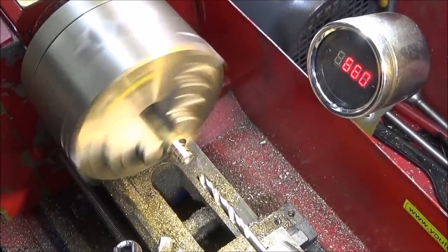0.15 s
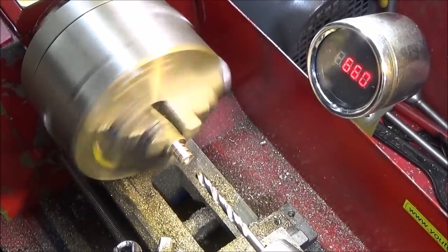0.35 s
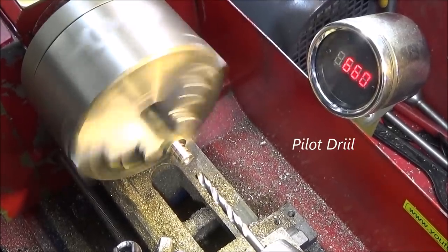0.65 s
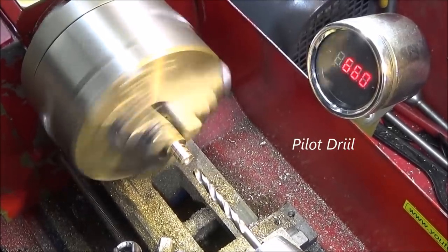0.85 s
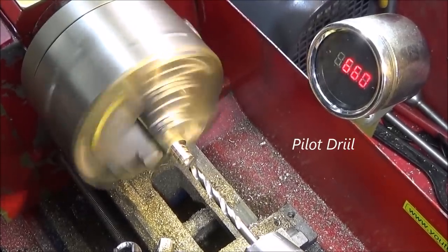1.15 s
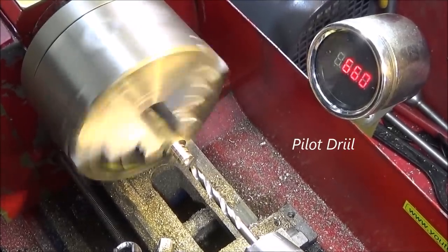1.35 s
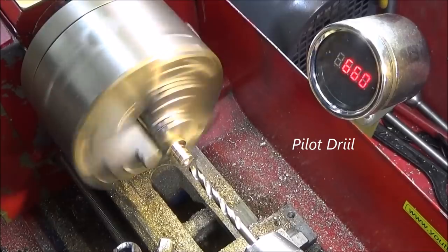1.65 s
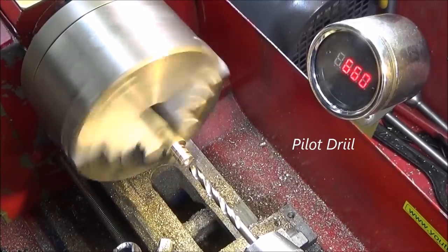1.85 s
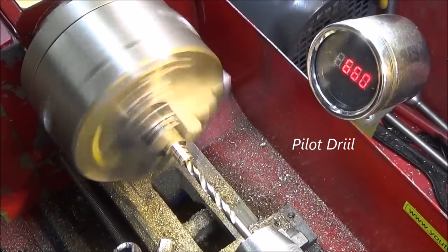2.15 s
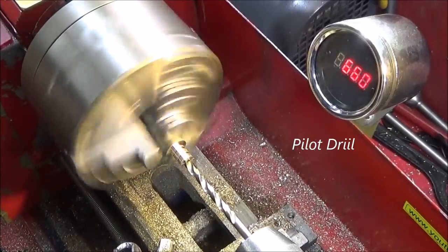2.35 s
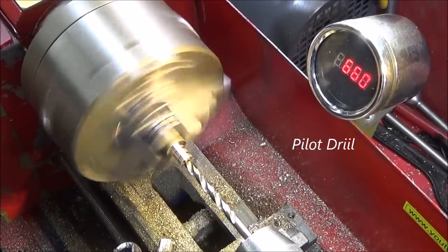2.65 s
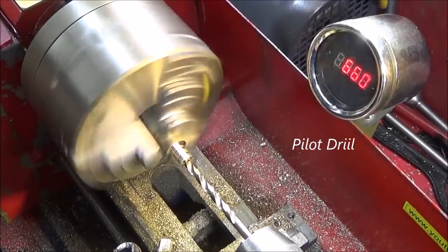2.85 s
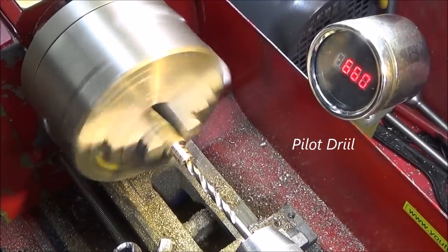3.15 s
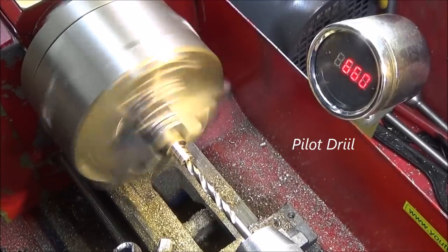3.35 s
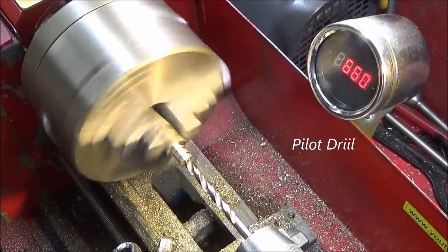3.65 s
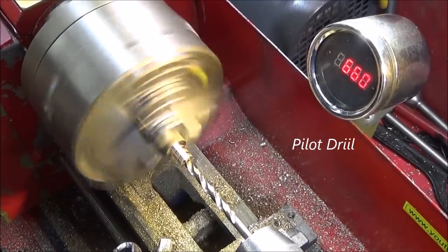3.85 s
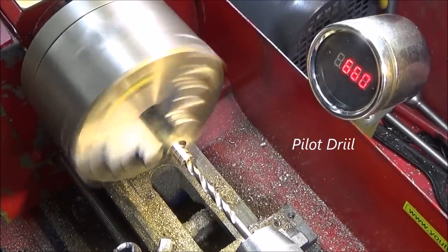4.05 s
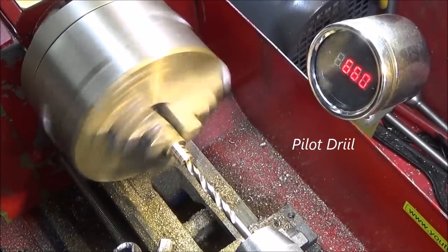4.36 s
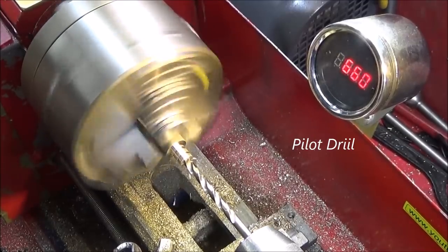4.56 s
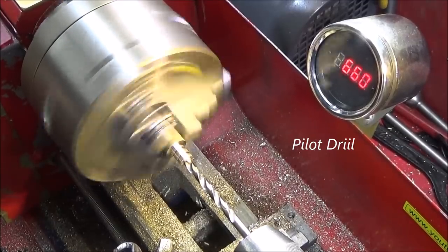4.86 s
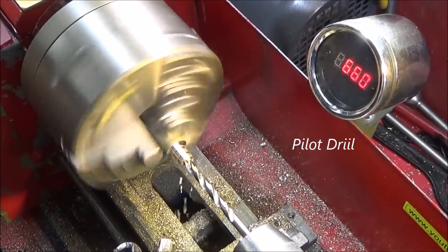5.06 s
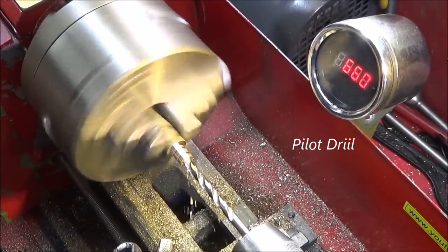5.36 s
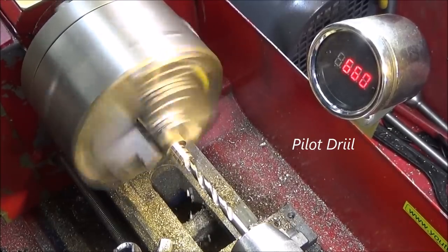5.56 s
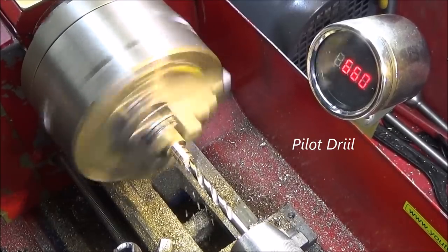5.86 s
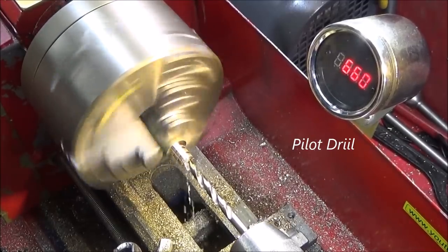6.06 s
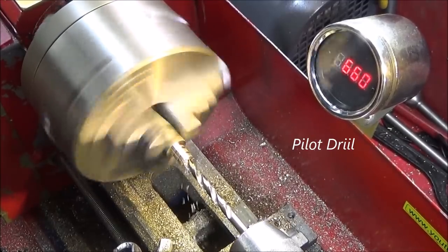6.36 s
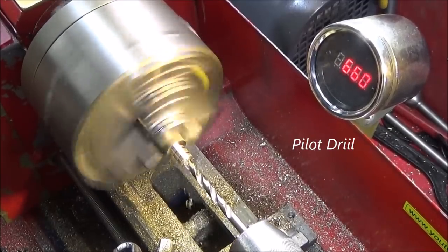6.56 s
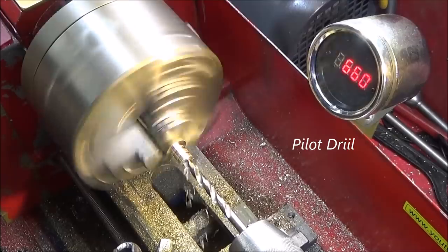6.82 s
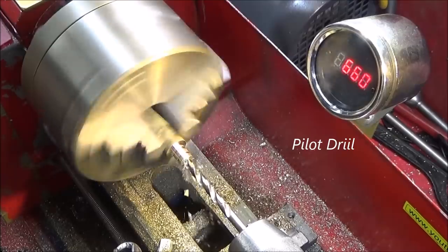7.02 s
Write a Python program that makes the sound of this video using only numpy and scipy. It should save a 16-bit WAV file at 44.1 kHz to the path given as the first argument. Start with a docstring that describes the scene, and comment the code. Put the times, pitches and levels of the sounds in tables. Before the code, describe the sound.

Close, dry stereo sound of a small metal lathe running in a workshop. From 0 s a low motor hum, a dense fluttering whine around 10 kHz, mid-pitched gear tones and a broad bearing rush continue steadily, with faint swarf ticks. At about 2.1 s a small chip click, a soft knock and a faint squeak sound. From 3.3 to 3.85 s the drill tip chirps about seven times, eleven per second, strongest midway. Small clicks lead to the bite at 4.4 s: a coarse, gritty scrape with ringing flutes, grumbles and brief squeaks, while bright chip hiss spreads over the machine. At 5 s a piercing squeal near 8.3 kHz starts abruptly and grows, wavering and throbbing eleven times a second. The scrape settles; after about 6.2 s the feed eases and hiss softens slightly, but the squeal persists to the end near 7 s, with low grumbles and sudden pitch sags.

```python
"""A small lathe spins a brass bar at about 660 rpm, close to a stereo microphone.
From the start, steady tones make the hum and whine of motor and gears, and shaped noise the rush of bearings.
Single chips, knocks and squeaks come first, then a pilot drill grazes the bar and chirps on it once a turn.
It bites with a coarse scrape, made of tiny random fractures, and cuts on with ringing flutes and a hiss of chips.
Last comes a high squeal, a wavering tone that throbs with every turn; later the drill is fed more gently."""
import sys
import numpy as np
from scipy import signal
from scipy.fft import rfft, irfft
from scipy.io import wavfile
from scipy.ndimage import uniform_filter1d

SR = 44100
rng = np.random.default_rng(int(sys.argv[2]) if len(sys.argv) > 2 else 0)


def wrap_up_sound(samples):
    """Save the sound to the file named by the first command line argument, as 16-bit audio."""
    columns = np.atleast_2d(samples).T
    # keep every value between -1 and 1, then stretch to whole-number steps
    tamed = np.clip(columns, -1, 1)
    steps = np.round(tamed * 32767).astype(np.int16)
    wavfile.write(sys.argv[1], SR, steps)


N = 317079

# Hum of the motor. Each row: multiple of the motor speed, level in dB before load and flutter.
HUM_TONES = [(3, -50.0), (6, -32.0), (12, -37.8), (18, -42.2)]
# Whine of the motor. Each row: multiple of the motor speed, level in dB before the shared trim and changes.
WHINE_TONES = [(231, -36.8), (233, -34.1), (234, -32.4), (235, -41.6), (237, -35.7), (238, -41.6),
               (239, -41.8), (240, -39.8), (243, -27.5), (244, -33.8), (245, -27.2), (246, -28.5),
               (247, -26.7), (248, -37.7), (249, -30.4), (250, -39.1), (251, -34.1), (252, -36.4),
               (253, -31.3), (254, -38.7), (255, -27.6), (256, -34.6), (257, -42.4), (258, -36.0),
               (259, -24.7), (260, -40.9), (261, -33.5)]
# Gear and belt tones. Each row: pitch in Hz, level in dB before the shared trim, change under full load in dB.
GEAR_TONES = [(281.8, -35, -4), (332, -36, -8.5), (562.2, -25.5, -12.5), (1176, -33, -5), (1450, -45, 4.5)]
# Colour of the bearing and brush noise. Each row: frequency in Hz, level in dB per Hz before the shared trim.
RUSH_COLOUR = [(25, -69), (130, -61), (210, -63), (300, -52.5), (430, -63.5), (600, -53.5), (780, -59.5),
               (1500, -59), (2600, -59), (6500, -58), (9200, -56), (10400, -53), (11500, -67),
               (15000, -95.5)]
# Resonances of headstock and guards. Each row: centre in Hz, width in Hz, lift in dB (below 0 is a dip).
HEADSTOCK_MODES = [(901, 76, 8), (1167, 22, 9), (1447, 65, 6), (1781, 19, 8), (2110, 24, 4), (3110, 73, 3),
                   (2600, 110, -2.5), (3560, 170, 2), (3860, 90, -2.5), (4110, 28, -10), (5080, 86, 3.5),
                   (5480, 250, 3.5), (6210, 350, 7), (6650, 130, 5.5), (7640, 97, 3.9)]
# Slow swells and sinks of the whine. Each row: middle in seconds, length in seconds, change in dB.
WHINE_DRIFTS = [(.3, .22, 3.2), (1.72, .28, 2.5), (2.86, 0.13, -2.5), (4.15, .3, 0.3)]
# Colour of the swarf ticks. Each row: frequency in Hz, relative level in dB.
TICK_COLOUR = [(1500, -14), (3500, 1.5), (5500, -3.5), (8000, -2), (11000, -20), (15000, -45)]
# Chips cracking off and tailstock knocks.
# Each row: middle in seconds, rms level at the middle in dB, centre in Hz, width in Hz, length in seconds.
CHIP_HITS = [(2.124, -18.5, 3420, 1500, 0.018), (2.13, -18, 6300, 3000, .025), (2.157, -33, 154, 50, 0.044),
             (3.47, -21, 5200, 900, 0.014), (4.267, -26, 345, 90, .025), (4.371, -13, 5600, 900, .002),
             (4.382, -20, 5503, 500, .013), (4.443, -19, 970, 250, 0.014), (4.44, -25, 3950, 401, 0.011),
             (4.5, -21.5, 335, 300, 0.015), (4.56, -21, 3600, 1000, .025), (4.672, -17, 5700, 500, .003),
             (4.877, -14.5, 6800, 1800, .013), (5.155, -20, 5550, 500, .007)]
# Short squeaks: the tip grazing the face at first, then the lips sticking and slipping.
# Each row: middle in seconds, rms level of the pure tone at the middle in dB, pitch in Hz, length in seconds.
SHORT_SQUEAKS = [(2.19, -30, 895, .1), (3.11, -24, 895, .012), (3.245, -22, 897, .009),
                 (4.446, -20, 1170, .012), (4.45, -29, 2900, .01), (4.58, -19, 1190, .02),
                 (4.897, -19.5, 2900, .01), (4.942, -25, 2530, .018), (4.978, -17.5, 2435, 0.017),
                 (5.293, -23, 2885, .012), (5.296, -25, 2140, .012), (5.38, -23, 2900, .01),
                 (5.426, -25.5, 2860, 0.024), (5.53, -22.5, 2890, .011), (5.593, -24, 2880, .012),
                 (5.622, -26, 2925, .014), (5.814, -25.5, 2890, 0.014)]
# Modes of the flutes and tailstock; many glide as the hole grips more of them. Each row: start in seconds,
# end in seconds, first Hz, last Hz, width in Hz, first level in dB, last level in dB, before the stutter.
FLUTE_MODES = [(4.43, 4.92, 1175, 1215, 150, -27.5, -26), (4.6, 4.9, 1330, 1330, 160, -30, -29),
               (4.95, 7.3, 1300, 1300, 280, -38.5, -38), (4.44, 4.99, 2910, 2890, 220, -28, -27),
               (5.05, 5.92, 2860, 2900, 300, -30.5, -35), (4.51, 4.87, 3130, 3130, 160, -30, -32),
               (4.52, 4.92, 2650, 2600, 400, -29, -27), (4.77, 4.85, 2050, 2250, 700, -24, -21),
               (4.9, 5.03, 2480, 2380, 450, -22.5, -25), (5.03, 5.46, 2480, 2740, 240, -25.5, -31),
               (4.46, 4.95, 7850, 7850, 700, -25, -26), (4.46, 4.95, 9400, 8700, 400, -28, -29),
               (5.0, 6.27, 6350, 7170, 700, -24, -28.5), (5.0, 5.949, 9620, 9950, 450, -26, -24),
               (6.0, 6.28, 10700, 10550, 800, -23.5, -24), (4.83, 6.35, 12600, 12600, 3100, -31, -36),
               (4.98, 6.35, 15000, 17000, 550, -29, -39), (6.553, 7.25, 7580, 7650, 500, -23, -25),
               (6.57, 7.25, 660, 670, 160, -28, -28.5), (6.62, 7.25, 420, 425, 120, -35, -36),
               (6.55, 7.25, 1455, 1455, 60, -35.5, -33)]
# The lips grab: the tailstock grumbles and the squeal sags.
# Each row: middle in seconds, length in seconds, grumble in dB, drop of the squeal's pitch in Hz.
LIP_GRABS = [(4.321, .04, -27, 0), (4.485, .03, -21.5, 0), (4.565, .03, -26, 0), (4.806, .04, -28, 0),
             (4.89, 0.031, -28, 0), (5.11, 0.026, -37, 121.5), (5.275, 0.037, -34, 109.5),
             (5.385, 0.021, -46, 69.5), (5.655, 0.0173, -47, 90), (5.965, 0.032, -28, 300),
             (6.22, .03, -38, 131), (6.697, .055, -29, 280), (6.745, .02, -27.5, -0.5),
             (6.94, 0.049, -29, 132), (7.025, .03, -33, 229), (7.067, .018, -29, 0),
             (7.128, 0.022, -30, 68)]
# Colour of the tailstock's grumble. Each row: frequency in Hz, relative level in dB.
GRUMBLE_COLOUR = [(40, -26), (200, -16), (380, 3), (520, -2), (680, 8), (850, 1), (1100, -22), (1450, 4.5),
                  (1800, -61)]
# Colour of the scrape. Each row: frequency in Hz, relative level in dB.
SCRAPE_COLOUR = [(500, -18), (1000, -8.5), (1300, -2.5), (1700, -3), (3000, 1.5), (4200, -2.5), (6000, -26),
                 (11000, -26)]
# Resonances of the drill in the scrape. Each row: centre in Hz, width in Hz, lift in dB.
DRILL_MODES = [(1196, 90, 11.3), (1410, 77, 5.4), (2310, 93, 8.1), (2500, 77, 2.4), (2886, 39, 12.8),
               (3200, 50, 5.8), (3920, 120, 9.1)]
# Colour of the chips' hiss. Each row: frequency in Hz, relative level in dB.
HISS_COLOUR = [(4000, -22), (5800, -12), (6600, 1.5), (7700, 15.5), (8900, 14), (10000, 9), (11200, 8.5),
               (12700, 2.5), (13700, -4), (15800, -10.5)]
# Resonances of the drill in the hiss. Each row: centre in Hz, width in Hz, lift in dB (below 0 is a dip).
DRILL_TREBLE_MODES = [(6470, 230, 0), (7900, 330, 1.5), (9600, 300, 7), (11280, 300, -6), (11850, 350, 6),
                      (12300, 260, 5), (14200, 220, 3), (14480, 220, -4), (14900, 400, 4.5)]
# The squeal's free pitch, before it sags and wanders. Each row: time in seconds, pitch in Hz.
SQUEAL_PITCH = [(5.0, 8260), (5.2, 8230), (5.5, 8210), (5.8, 8300), (6.15, 8330), (6.45, 8430),
                (6.63, 8360), (6.9, 8320), (7.1, 8370), (7.19, 8400)]
# The hole is out of round. Each row: tight spots per turn, swing in dB, place in the turn from 0 to 1.
HOLE_TIGHT_SPOTS = [(1, 1.9, .14), (2, 1.0, .2), (3, 1.3, .32), (4, 2.0, .055), (5, 1.3, .055), (6, .7, .1),
                    (7, .8, .03)]

TIME = np.arange(N) / SR
FREQ = np.maximum(np.arange(N // 2 + 1) * SR / N, 1)
SIDES = np.array([[1], [-1]])  # left, right

MOTOR_HZ, SPINDLE_HZ = 40.597, 10.98
# the whine and the rush dip briefly just before the bite
DIP_S, DIP_LENGTH_S, DIP_DB = 4.38, 0.016, -5.5
# a motor bearing sings, swayed by the belt's tight spot
SING_HZ, SING_WIDTH_HZ, SING_DB = 3647, 46, -37
BELT_LAP_HZ, BELT_TIGHT_S = 6.65, .03
# the tip rubs the face once a turn, hardest in the middle of the run; the ends are quieter
RUB_FIRST_S, RUB_HZ, RUB_LENGTH_S = 3.3, 890, 0.014
RUB_DB, RUB_ENDS_DB = -16, -4.5
# the drill bites, sinks in to its full width, and later is fed more gently
BITE_S, BITE_ATTACK_S, SINK_S = 4.43, 0.048, 0.76
EASE_S, EASE_TIME_S, EASED_LOAD = 6.17, 0.45, 0.71
# the scrape is coarse while the point enters, then settles
SCRAPE_DB, ENTRY_DB, ENTRY_HOLD_S, SETTLE_S = -33.5, 14, 0.38, 0.43
# the hiss is strongest while the chips fly clear of the shallow hole
HISS_DB, HISS_LOAD_DB = -24, 2.6
SPRAY_DB, SPRAY_S, SPRAY_LENGTH_S = 4, 5.18, 0.52
# the squeal starts abruptly and grows as the hole deepens
SQUEAL_S, SQUEAL_ATTACK_S, SQUEAL_DB = 5.0, .02, -15.5
SQUEAL_YOUNG_DB, SQUEAL_GROW_S = -6, 0.32


def undb(db):
    """Turn decibels into gain."""
    return 10 ** (np.asarray(db) / 20)


def unit(x):
    """Scale to an average (rms) level of 1."""
    return x / np.sqrt(np.mean(x ** 2))


def curves(table):
    """Join the points of each column by straight lines in time."""
    s, *columns = np.transpose(table)
    return [np.interp(TIME, s, column) for column in columns]


def ramp(s, length):
    """A straight rise from 0 to 1, centred on s."""
    return np.clip((TIME - s) / length + .5, 0, 1)


def swell(s, length):
    """A bell-shaped rise and fall that peaks at s."""
    return np.exp(-np.minimum(((TIME - s) / length) ** 2, 50))


def settle(s, length):
    """Hold at 1 until s, then die away."""
    return np.exp(-np.maximum(TIME - s, 0) / length)


def walk(rate):
    """Smooth random motion, mostly slower than rate changes a second, with a spread of 1."""
    smooth = rfft(rng.standard_normal(N)) / (1 + (FREQ / rate) ** 4)
    return unit(irfft(smooth, N))


def count_turns(hz):
    """Count the cycles run through so far."""
    return np.cumsum(hz * np.ones(N)) / SR


def tone(turns, db, spread=0.28):
    """A pure tone of the given rms level; it reaches the two ears slightly out of step."""
    phase = 2 * np.pi * (turns + rng.random())
    ear_shift = SIDES * spread * rng.choice([-1, 1])
    return np.sqrt(2) * undb(db) * np.sin(phase + ear_shift)


def grains(rate, scatter_db):
    """Dense tiny fractures of random size, about rate a second; rms 1."""
    hits = rng.random(N) < rate / SR
    signs = rng.choice([-1, 1], N)
    return unit(hits * signs * undb(scatter_db * rng.standard_normal(N)))


def colour(points, resonances=()):
    """Gain at each frequency: a smooth spectrum, lifted or dipped at its resonances."""
    hz, db = np.transpose(points)
    db = np.interp(np.log(FREQ), np.log(hz), db)
    for centre, width, lift in resonances:
        db = db + lift / (1 + (2 * (FREQ - centre) / width) ** 2)
    return undb(db)


def radiate(force, gain, spread=0.19, bass_hz=200):
    """A force sounds through a body; reflections off the lathe bed make the ears differ above the bass."""
    direct = rfft(force) * gain
    scatter = np.exp(2j * np.pi * rng.random(len(FREQ)))
    side = direct * scatter * spread / (1 + (bass_hz / FREQ) ** 1.5)
    return irfft(direct, N) + SIDES * irfft(side, N)


def ringing(hz, width):
    """A resonance of fixed or moving pitch, kept going by friction; rms 1."""
    angle = 2 * np.pi * count_turns(hz)

    def sway():
        return irfft(rfft(rng.standard_normal(N)) / (1 + (2 * FREQ / width) ** 2), N)

    return unit(radiate(sway() * np.cos(angle) + sway() * np.sin(angle), 1))


def drill_load():
    """Load from 0 to 1: it builds as the point sinks in and drops when the feed is eased."""
    sunk = ramp(BITE_S + SINK_S / 2, SINK_S)
    return sunk * (1 - (1 - EASED_LOAD) * ramp(EASE_S, EASE_TIME_S))


def running_noise(motor, rush_db=-0.5, rush_load_db=-6.0, brush_db=0.66):
    """Brushes and bearings rub harder once a motor or spindle turn; the rush sounds quieter while the drill cuts."""
    rub_db = brush_db * np.sin(2 * np.pi * motor)
    rub_db = rub_db + 0.033 * np.sin(2 * np.pi * SPINDLE_HZ * TIME) + 0.83 * walk(25)
    # the castings and covers have many small modes, which ripple the spectrum
    ripple = unit(uniform_filter1d(rng.standard_normal(len(FREQ)), size=220))
    ripple_db = 1.58 * ripple * np.clip(FREQ / 1500, 0, 1)
    body = colour(RUSH_COLOUR, HEADSTOCK_MODES) * undb(ripple_db)
    # the square root turns a level per Hz into a level for the whole noise
    rush = radiate(rng.standard_normal(N) * undb(rub_db), body, spread=0.27) * np.sqrt(SR / 2)
    return rush * undb(rush_db + rush_load_db * drill_load() ** 2 + DIP_DB * swell(DIP_S, DIP_LENGTH_S))


def motor_tones(motor, waver, whine_db=-0.94, whine_cut_db=-5, hum_load_db=-7.5):
    """The motor hums and whines at multiples of its speed; both sound quieter while the drill cuts."""
    whine_level = whine_db + whine_cut_db * ramp(BITE_S, BITE_ATTACK_S) + DIP_DB * swell(DIP_S, DIP_LENGTH_S)
    whine_level = whine_level + sum(db * swell(s, length) for s, length, db in WHINE_DRIFTS)
    hum_level = hum_load_db * drill_load()
    out = sum(tone(k * motor, db + whine_level + waver(), spread=0.32) for k, db in WHINE_TONES)
    return out + sum(tone(k * motor, db + hum_level + waver() / 2, spread=0.054) for k, db in HUM_TONES)


def gear_tones(clock, waver, gears_db=-2.0):
    """Gears and belt follow the shaft with a wobble of their own; load closes backlash and quiets most tones."""
    belt = clock + count_turns(0.00149 * walk(12.5))
    closed = (drill_load() + ramp(BITE_S, BITE_ATTACK_S)) / 2
    return sum(tone(hz * belt, db + gears_db + load_db * closed + 0.2 * waver())
               for hz, db, load_db in GEAR_TONES)


def machine(wobble=0.000225, flutter_db=2.5):
    """Motor, gears and running noise share one slightly uneven shaft speed."""
    clock = count_turns(1 + wobble * walk(4.1))
    motor = MOTOR_HZ * clock
    flutter = walk(8.2)

    def waver():  # the same flutter, shifted in time for each tone
        return flutter_db * np.roll(flutter, rng.integers(N))

    return running_noise(motor) + motor_tones(motor, waver) + gear_tones(clock, waver)


def bearing(lap_db=4.5, waver_db=0.9, load_db=-7):
    """A motor bearing sings thinly, louder as the belt's tight spot comes round; it sounds quieter under load."""
    lap = np.cos(2 * np.pi * BELT_LAP_HZ * (TIME - BELT_TIGHT_S))
    level_db = SING_DB + lap_db * lap + waver_db * walk(9) + load_db * drill_load()
    return ringing(SING_HZ, width=SING_WIDTH_HZ) * undb(level_db)


def ticks(ticks_db=-33):
    """Loose swarf ticks faintly against the spinning chuck."""
    return unit(radiate(grains(130, 4.1), colour(TICK_COLOUR))) * undb(ticks_db)


def touches():
    """Now and then a chip cracks off or the tailstock knocks: a short burst of noise around one resonance."""
    out = 0
    for s, db, hz, width, length in CHIP_HITS:
        ring = 1 / (1 + (2 * (FREQ - hz) / width) ** 2)
        burst = unit(irfft(rfft(rng.standard_normal(N)) * ring, N))
        out += burst * undb(db) * swell(s, length)
    return out


def rubs(count=7, rough=.45, graze_db=-31.0, graze_s=3.23, graze_length_s=0.25):
    """The tip grazes the face lightly and chirps against it once a turn."""
    strokes = 0
    for turn, place in enumerate(np.linspace(-1, 1, count)):
        level = undb(RUB_DB + RUB_ENDS_DB * place ** 2)
        strokes = strokes + level * swell(RUB_FIRST_S + turn / SPINDLE_HZ, RUB_LENGTH_S)
    graze = undb(graze_db) * swell(graze_s, graze_length_s)
    return strokes * tone(RUB_HZ * TIME, 0) + (rough * strokes + graze) * ringing(RUB_HZ, width=64)


def squeaks(rough=0.42, waver_hz=22):
    """The tip grazes the face at first, later the lips stick and slip: each time a short, rough tone."""
    waver = waver_hz * walk(60)
    out = 0
    for s, db, hz, length in SHORT_SQUEAKS:
        squeak = tone(count_turns(hz + waver), 0) + rough * ringing(hz, width=220)
        out = out + squeak * undb(db) * swell(s, length)
    return out


def flutes(stutter_db=1.8, fade_share=0.12):
    """Friction keeps the flutes ringing, each mode in its own fits and starts; long rings fade more slowly."""
    out, fits = 0, walk(13)
    for start, end, first_hz, last_hz, width, first_db, last_db in FLUTE_MODES:
        hz, db = curves([(start, first_hz, first_db), (end, last_hz, last_db)])
        stutter = stutter_db * np.roll(fits, rng.integers(N))
        fade = fade_share * (end - start)
        present = ramp(start, fade) * (1 - ramp(end, fade))
        out = out + ringing(hz, width) * present * undb(db + stutter)
    return out


def lip_beat():
    """Two lips pass each high spot, so the cut pulses twice a turn."""
    return np.sin(2 * np.pi * 2 * SPINDLE_HZ * TIME)


def grumble(steady_db=-40):
    """Tiny fractures of the brass shake the tailstock, hardest when the lips grab."""
    level = undb(steady_db) * ramp(BITE_S, BITE_ATTACK_S)
    level = level + sum(undb(db) * swell(s, length) for s, length, db, _ in LIP_GRABS)
    force = grains(700, 2.6) * undb(1.6 * lip_beat())
    return unit(radiate(force, colour(GRUMBLE_COLOUR))) * level


def judder(depth_db=2.1):
    """The point catches and lets go unevenly, many times a turn; rms 1."""
    return unit(undb(depth_db * walk(140)))


def scrape():
    """The lips tear off brass in tiny fractures, which shake the drill."""
    level_db = SCRAPE_DB + ENTRY_DB * settle(BITE_S + ENTRY_HOLD_S, SETTLE_S)
    force = grains(4000, 2.8) * undb(1.0 * lip_beat()) * judder()
    sound = unit(radiate(force, colour(SCRAPE_COLOUR, DRILL_MODES)))
    return sound * ramp(BITE_S, BITE_ATTACK_S) * undb(level_db)


def hiss():
    """Very dense, fine fractures make the chips hiss, more so under load."""
    level_db = HISS_DB + SPRAY_DB * swell(SPRAY_S, SPRAY_LENGTH_S) + HISS_LOAD_DB * drill_load()
    force = grains(16000, 3.0) * undb(0.66 * lip_beat() + 2.2 * walk(60))
    sound = unit(radiate(force, colour(HISS_COLOUR, DRILL_TREBLE_MODES)))
    return sound * ramp(BITE_S, BITE_ATTACK_S) * undb(level_db)


def squeal(jitter_hz=34, wander_hz=24, uneven_db=2.5, rasp_db=-14, turn_sag_hz=26, grip_sag_hz=7):
    """The drill twists to and fro in the hole; its tone swells at tight spots, and slips roughen it."""
    angle = 2 * np.pi * SPINDLE_HZ * TIME
    grip_db = sum(db * np.cos(spots * (angle - 2 * np.pi * place)) for spots, db, place in HOLE_TIGHT_SPOTS)
    free_hz, = curves(SQUEAL_PITCH)
    hz = free_hz - turn_sag_hz * np.sin(angle)
    hz = hz - sum(sag * swell(s, length) for s, length, _, sag in LIP_GRABS)
    hz = hz + wander_hz * walk(54) - grip_sag_hz * grip_db  # each dB of grip pulls the pitch down
    throb = unit(undb(grip_db + uneven_db * walk(81)))
    whistle = tone(count_turns(hz + jitter_hz * walk(180)), 0, spread=0.17)
    rasp = undb(rasp_db) * ringing(hz, width=320)
    level_db = SQUEAL_DB + SQUEAL_YOUNG_DB * settle(SQUEAL_S, SQUEAL_GROW_S)
    return (throb * whistle + rasp) * ramp(SQUEAL_S, SQUEAL_ATTACK_S) * undb(level_db)


def scene():
    """The running lathe sounds a little to the right, the drill's squeal a little to the left."""
    right, left = undb(SIDES * -.17), undb(SIDES * .7)
    lathe = right * (machine() + bearing() + ticks())
    drill = touches() + rubs() + squeaks() + flutes() + grumble() + scrape() + hiss()
    return lathe + drill + left * squeal()


def record(dry, top_hz=15800):
    """Round off the highest peaks and cut everything above the top frequency steeply."""
    rounded = dry / (1 + (dry / .95) ** 8) ** (1 / 8)
    low_pass = signal.ellip(10, .2, 80, top_hz, fs=SR, output="sos")
    return signal.sosfilt(low_pass, rounded)


dry = scene()
out = record(dry)
wrap_up_sound(out)
```